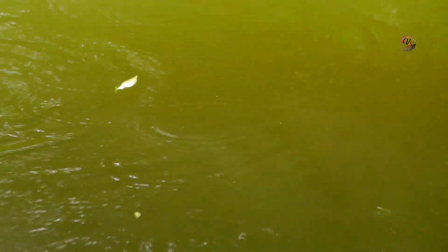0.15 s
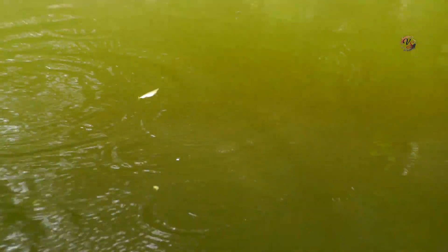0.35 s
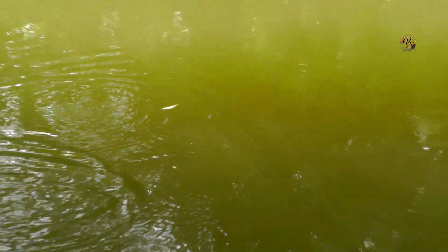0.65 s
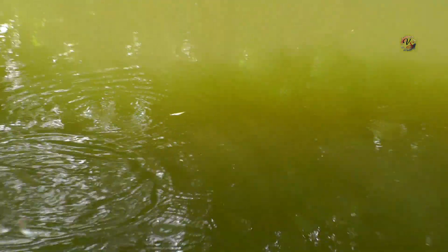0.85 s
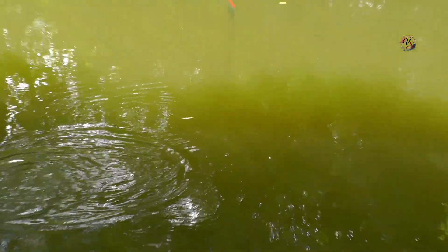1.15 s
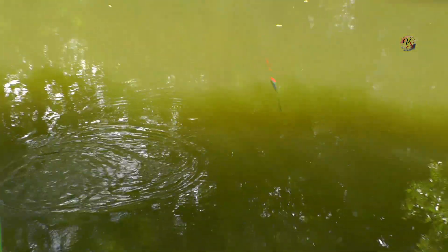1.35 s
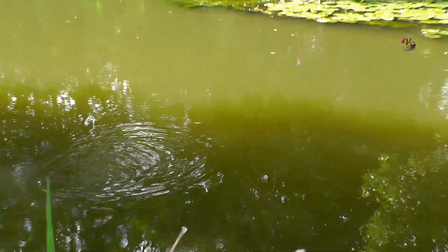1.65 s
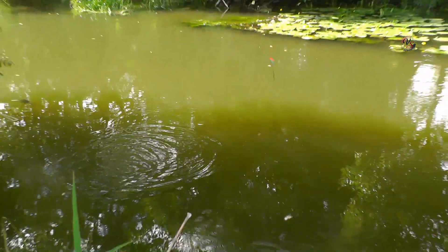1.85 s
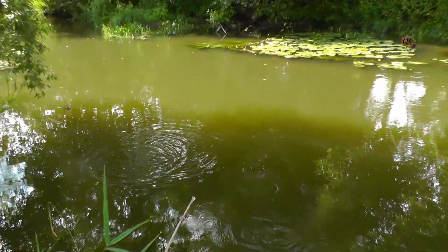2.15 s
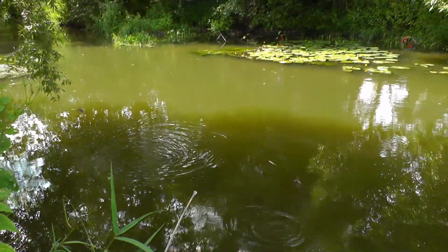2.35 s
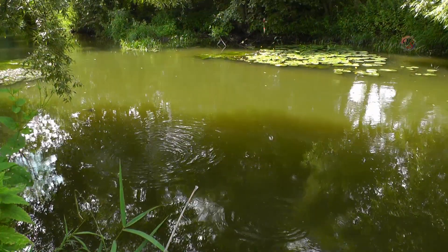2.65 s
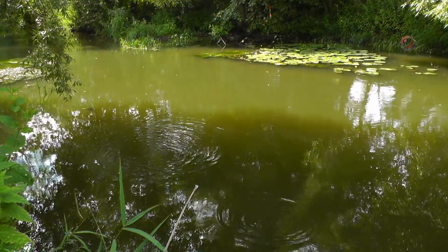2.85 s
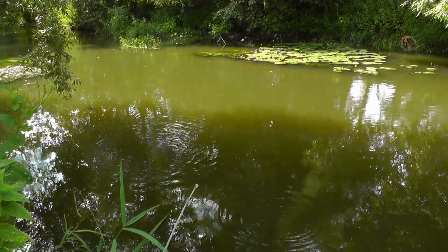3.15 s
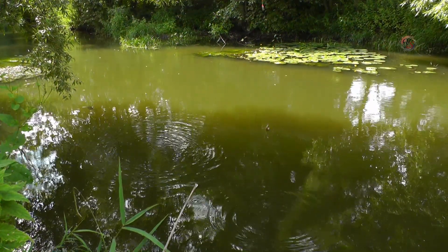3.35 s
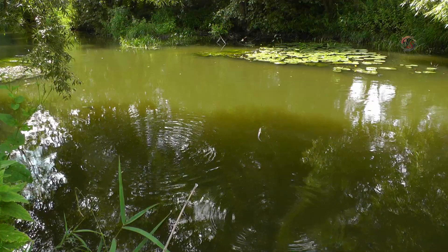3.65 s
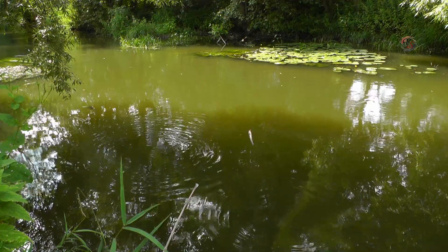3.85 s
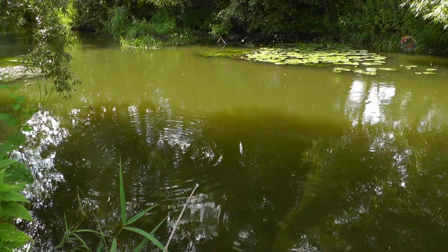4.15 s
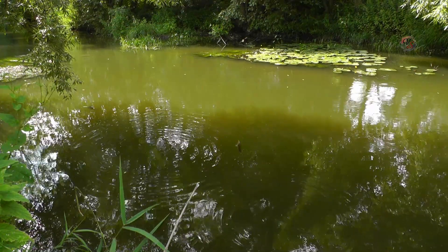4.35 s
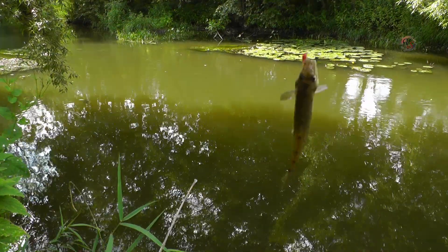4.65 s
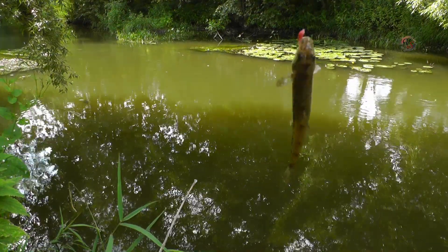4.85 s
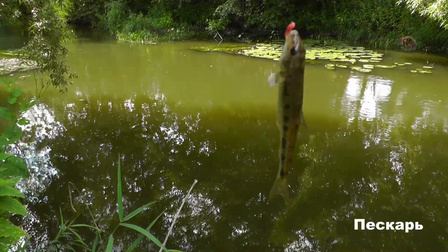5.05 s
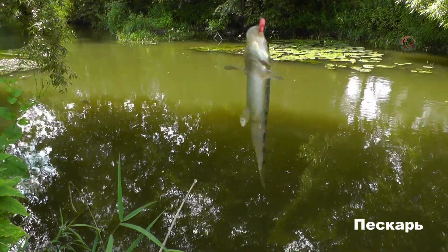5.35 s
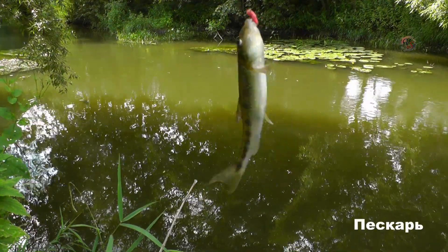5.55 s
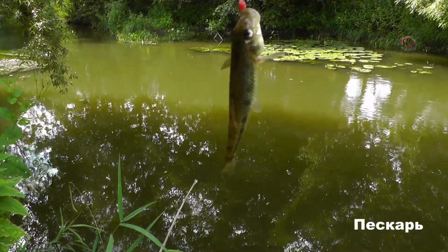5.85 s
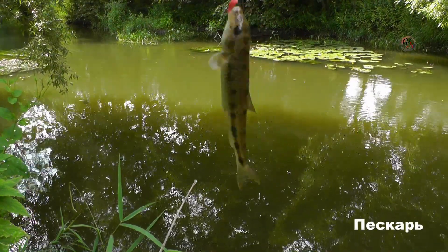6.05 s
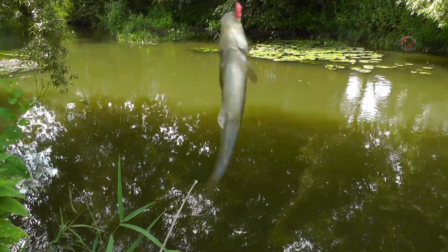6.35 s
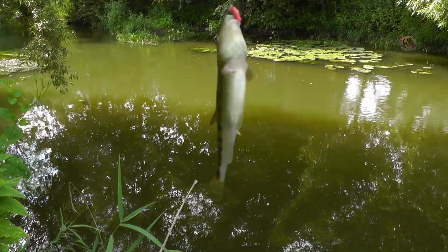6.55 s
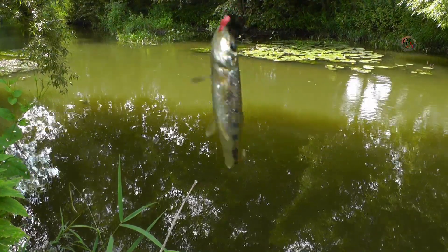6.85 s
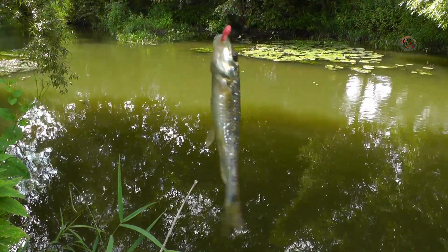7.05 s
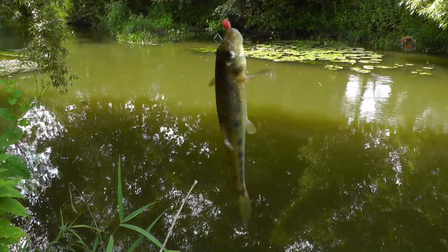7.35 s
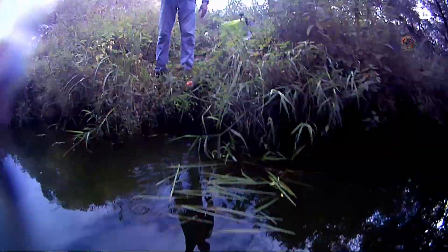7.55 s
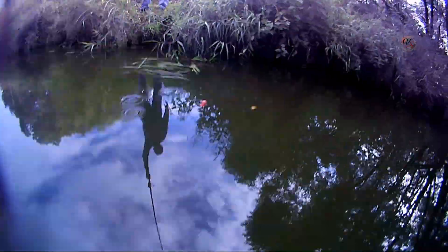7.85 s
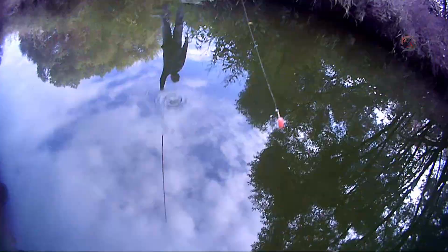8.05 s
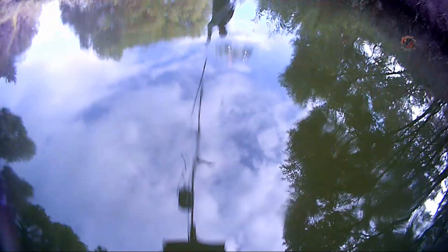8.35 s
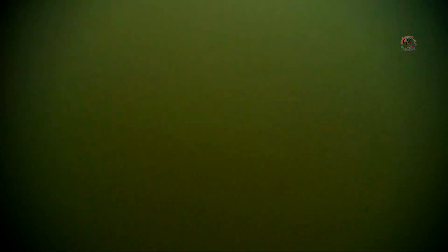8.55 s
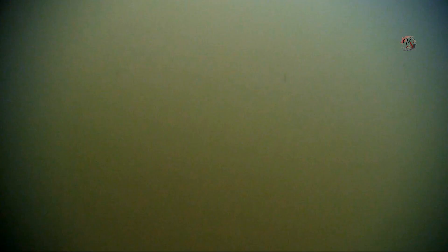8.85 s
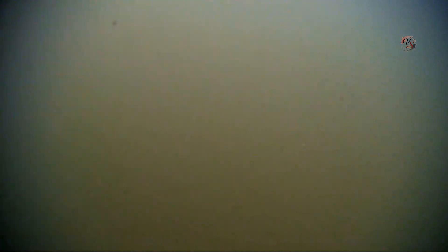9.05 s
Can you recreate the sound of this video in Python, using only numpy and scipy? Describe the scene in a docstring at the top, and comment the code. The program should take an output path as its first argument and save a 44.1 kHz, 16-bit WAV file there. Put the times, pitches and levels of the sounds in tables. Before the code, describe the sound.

Small birds buzz and whistle over low wind rumble and light water drips, then a sudden cut to near silence and a loud gulping plunge.

```python
"""On the bank of a wooded pond, two microphones hear small birds buzz and whistle, and an insect shrill briefly
near 11 kHz, as warbling tones with scatter. Wind rumble, roar and hiss are shaped noise, with puffs on the
right port; drips are ringing bubbles and spray. The hiss steps up at 4.556 s. At 7.63 s a hard switch leads to
a second, mono camera with a faint stuttering whine (harmonic sines). It is swung out and plunges in: noise-
burst splashes, knocks that ring the housing, and an overloading gulp of large and small bubbles."""
import sys
import numpy as np
from scipy import signal
from scipy.fft import rfft, irfft
from scipy.io import wavfile
from scipy.ndimage import uniform_filter1d

SR = 44100
rng = np.random.default_rng(int(sys.argv[2]) if len(sys.argv) > 2 else 0)


def inscribe(sig):
    """Save sig as 16-bit PCM at rate SR to the path in sys.argv[1].

    A 1-D sig is mono; a 2-D sig holds one channel per row.
    Samples are clipped to [-1, 1] before scaling.
    """
    pcm = np.round(np.clip(np.atleast_2d(sig).T, -1, 1) * 32767)
    wavfile.write(sys.argv[1], SR, pcm.astype(np.int16))


N = 405279
T = np.arange(N) / SR
SWAP_S, SUNK_S = 7.63, 8.632  # the second camera takes over; it goes under


def amp(db):
    """Decibels to amplitude."""
    return 10 ** (np.asarray(db) / 20)


def evened(x):
    """Scale to an RMS of one."""
    return x / np.sqrt(np.mean(x ** 2) + 1e-20)


def read(points, hz):
    """Read a curve along log frequency."""
    point_hz, value = np.transpose(points)
    return np.interp(np.log(hz + 1), np.log(point_hz + 1), value)


def curve(rows, column=1):
    """Draw one table column as straight lines over time."""
    return np.interp(T, *np.transpose(rows)[[0, column]])


def add(mix, start_s, sound):
    """Lay a sound into the mix, cutting it off at the end."""
    part = mix[..., round(start_s * SR):][..., :sound.shape[-1]]
    part += sound[..., :part.shape[-1]]


def smooth(length, size):
    """Slow chance: noise averaged twice over size samples."""
    once = uniform_filter1d(rng.standard_normal(length), size)
    return evened(uniform_filter1d(once, size))


def noise(spectrum, patchy_db, same=((1, 1), (2, 1)), start=0, stop=N):
    """Random short-time spectra with drifting patches, on two microphones, between two samples."""
    frames, hz = (stop - start) // 256 + 5, np.fft.rfftfreq(1024, 1 / SR)
    a, b, c, d, patches = rng.standard_normal((frames, 513, 5), dtype=np.float32).T
    patches = uniform_filter1d(patches, size=8, axis=0)
    patches = evened(uniform_filter1d(patches, size=8, axis=1))
    likeness = np.clip(read(same, hz), -1, 1)[:, None]
    left = a + 1j * b
    right = likeness * left + np.sqrt(1 - likeness ** 2) * (c + 1j * d)
    spectra = np.array([left, right]) * amp(read(spectrum, hz)[:, None] + patchy_db * patches)
    out = evened(signal.istft(spectra, nperseg=1024, noverlap=768)[1][:, :stop - start])
    return np.pad(out, ((0, 0), (start, N - stop)))


def band(x, hz, width_hz):
    """One resonance."""
    return signal.lfilter(*signal.iirpeak(hz, hz / width_hz, SR), x)


def chirp(length_s, level_db, first_hz, last_hz, warble_hz, pan_db):
    """A thin whistle drifts and warbles fast and unevenly, in short pulses, swinging widest at full effort."""
    u = np.linspace(0, 1, round(length_s * SR))
    effort = np.sin(np.pi * u ** 0.76)
    warble = 0.897 * smooth(len(u), size=60) + 0.4362 * smooth(len(u), size=500)
    swing_hz = warble_hz * (0.613 + 0.4673 * effort) * warble
    hz = first_hz + (last_hz - first_hz) * u + swing_hz
    pulses = amp(2.51 * smooth(len(u), size=90) + 1.56 * smooth(len(u), size=250))
    tone = evened(np.sin(2 * np.pi * np.cumsum(hz) / SR) * pulses)
    return tone * effort ** 0.76 * amp(level_db + pan_db * np.array([[.5], [-.5]]))


def scattered(calls):
    """Leaves and banks scatter each call in sparse echoes, differently for the two microphones."""
    t = np.arange(6000) / SR
    sign = rng.choice([-1., 1.], (2, 6000))
    sparse = rng.random((2, 6000)) < .05
    decay = amp(-60 * t / 0.053) + amp(-2.5 - 60 * t / 0.48)  # a short and a long decay
    echoes = sign * sparse * decay
    echoes /= np.linalg.norm(echoes, axis=1, keepdims=True)
    return amp(-3.0) * calls + amp(1.5) * signal.oaconvolve(calls, echoes, axes=1)[:, :N]


# Buzzy two-voiced calls of one kind of bird, levels before scatter and pan:
# start_s, length_s, level_db, low_voice_hz, high_voice_hz
BUZZ_CALLS = [(.001, 0.084, -51.5, 6360, 7350), (0.249, .12, -48, 6250, 7610),
              (0.405, .15, -51.5, 6800, 7625), (0.799, 0.1356, -49, 6560, 7720),
              (1.158, .12, -58, 6550, 7700), (1.403, 0.16, -53.5, 6096, 7460),
              (1.6, .11, -54.5, 6266, 7200), (1.895, .145, -50.5, 6300, 7450),
              (2.188, 0.13, -52, 6650, 7700), (2.29, 0.111, -56, 6300, 7150),
              (2.372, 0.085, -52, 6380, 7400), (2.68, 0.116, -53, 6990, 8130),
              (3.189, 0.142, -54.5, 6380, 7265), (3.782, 0.103, -58, 6120, 6690),
              (4.102, 0.14, -52, 7120, 8480), (4.262, .12, -52, 6920, 8200), (4.43, .065, -58, 6100, 6930),
              (4.549, 0.062, -47.5, 6670, 7600), (4.609, .2, -51.5, 6404, 7204),
              (4.803, 0.148, -46, 6400, 7465), (5.045, 0.129, -43.5, 6650, 7800),
              (5.242, .11, -45, 6626, 7900), (5.491, 0.1406, -43, 7186, 8223),
              (5.99, 0.192, -55.5, 6447, 6900), (6.15, 0.15, -45.5, 6970, 8150),
              (6.596, 0.137, -49, 6560, 7900), (6.901, .11, -58.5, 6780, 7600),
              (7.07, 0.14, -54, 6300, 6820), (7.167, 0.1287, -46, 6850, 8160),
              (7.568, 0.067, -55.5, 6160, 6960)]
# Thin whistles, with an insect's brief high calls near 11 kHz among them, levels likewise: start_s, length_s,
# level_db, first_pitch_hz, last_pitch_hz
WHISTLE_CALLS = [(0.04, .075, -53.5, 5534, 5500), (0.447, 0.083, -47, 5760, 6380),
                 (1.064, 0.091, -58.5, 10900, 10760), (1.073, 0.154, -47.5, 11250, 11290),
                 (1.17, 0.107, -52, 5450, 5530), (1.555, 0.0835, -51, 6230, 6220),
                 (1.798, 0.0218, -49, 5950, 4350), (1.816, 0.051, -46, 5247, 5545),
                 (1.81, 0.0378, -46, 6345, 6746), (2.009, 0.115, -47.5, 5400, 5750),
                 (2.291, 0.13, -52.5, 6215, 6080), (2.626, 0.095, -53, 5580, 5493),
                 (2.638, 0.079, -54, 6300, 6594), (2.795, 0.0306, -52, 6474, 3933),
                 (2.814, 0.02, -53.5, 3787, 6370), (2.826, 0.074, -44.5, 6420, 6500),
                 (2.827, 0.1, -49.5, 7000, 6930), (4.988, 0.0726, -47.5, 6740, 5400),
                 (5.215, 0.0122, -44.5, 8200, 7220), (5.399, .043, -53.5, 5850, 5710)]
BUZZ_RISE = 0.0099  # each voice climbs from this share below its pitch to as much above
# warble scale, widened further by effort; the buzz figure is for a call at MEAN_CALL_DB
BUZZ_WARBLE_HZ, WHISTLE_WARBLE_HZ, MEAN_CALL_DB = 383, 130.8, -48
WARBLE_PER_DB = 0.5  # louder buzzes warble wider (dB per dB)
BUZZ_PAN_DB, WHISTLE_PAN_DB = -.4, .5  # left over right


def birds():
    """Each buzz is two warbling voices at once, each whistle one; the wood scatters them all."""
    calls = np.zeros((2, N))
    for start_s, length_s, level_db, *voices in BUZZ_CALLS:
        warble_hz = BUZZ_WARBLE_HZ * amp(WARBLE_PER_DB * (level_db - MEAN_CALL_DB))
        for voice_hz in voices:
            first_hz, last_hz = voice_hz * (1 - BUZZ_RISE), voice_hz * (1 + BUZZ_RISE)
            add(calls, start_s, chirp(length_s, level_db, first_hz, last_hz, warble_hz, BUZZ_PAN_DB))
    for start_s, *shape in WHISTLE_CALLS:
        add(calls, start_s, chirp(*shape, WHISTLE_WARBLE_HZ, WHISTLE_PAN_DB))
    return scattered(calls)


def fizz(t):
    """Fifty tiny bubbles start within 90 ms and ring at 900 to 8100 Hz, few of them loud."""
    when, pitch, size = rng.random((50, 3, 1)).transpose(1, 0, 2)
    age = np.maximum(t - when * .09, 0)
    hz = 900 * 9. ** pitch
    level_db = 14.0 * size ** 2 - 60 * age * hz / 18.0  # 60 dB down after 18 cycles
    return (amp(level_db) * np.sin(2 * np.pi * hz * age)).sum(axis=0)


# Water slapping, level before the swell: start_s, level_db, t60_s
WATER_SLAPS = [(.035, -40.5, 0.21), (.14, -39.5, 0.23), (.16, -44, .096), (.219, -34.5, 0.074),
               (1.415, -32, 0.099), (1.44, -37.5, 0.099), (1.457, -31, 0.051), (1.542, -39.5, 0.185),
               (1.566, -33, 0.13), (1.605, -42, 0.23), (7.66, -66, .4), (7.705, -62.5, 0.21),
               (7.801, -63.5, 0.185), (7.875, -53, 0.0506), (7.983, -44, 0.0277), (7.994, -57.5, .25),
               (8.012, -53, 0.125), (8.036, -52, 0.085), (8.456, -62, .06), (8.489, -63, .086),
               (8.599, -34, 0.11), (8.606, -21, 0.08), (8.611, -8, 0.0296), (8.618, -18, 0.0557),
               (8.635, -28, 0.041), (8.649, -31.5, 0.092), (8.662, -33.5, .092), (8.678, -33, 0.066),
               (8.685, -27, .045), (8.697, -15, 0.039), (8.701, -10.5, 0.0247), (8.711, -9.5, .05),
               (8.723, -11.5, 0.0818), (8.745, -33, 0.08), (8.775, -38.5, .06), (8.807, -48.5, .098),
               (8.842, -54.5, 0.096), (8.885, -63, 0.171), (8.965, -66.5, .25)]
# Spray colour, before tilt: frequency_hz, relative_db
SPRAY_SPECTRUM = [(59, -33), (100, 15), (434, 3), (1190, -2.5), (2520, -6.5), (4000, -12), (6220, -19),
                  (10700, -28.5), (13800, -40.5), (15000, -76)]
# By place: heard from the bank; at the second camera in the air; under water
# Swell time of a slap: [rise_s]
SLAP_SWELL_S = (0.007, 0.0024, 0.0018)
# Treble tilt: [tilt_db per octave]
SLAP_TREBLE_DB = (8.5, 3.5, 0.24)
# Spray over fizz: [level_db]
SPRAY_OVER_FIZZ_DB = (4.5, 2.5, -1)


def splash():
    """Each slap is a burst of spray noise and a swarm of tiny bubbles, swelling fast and dying away."""
    mix, t, hz = np.zeros(N), np.arange(8192) / SR, np.fft.rfftfreq(8192, 1 / SR)
    for start_s, level_db, t60_s in WATER_SLAPS:
        place = (start_s > SWAP_S) + (start_s > SUNK_S)
        tilt_db = SLAP_TREBLE_DB[place] * np.log2(hz / 1500 + .05)
        colour = amp(read(SPRAY_SPECTRUM, hz) + tilt_db)
        spray = rng.standard_normal(8192) * amp(2.2 * smooth(8192, size=40))
        swarm = evened(np.pad(fizz(t[:4096]), (0, 4096)))
        both = amp(SPRAY_OVER_FIZZ_DB[place]) * evened(spray) + swarm
        crackle = evened(irfft(rfft(both) * colour))
        swell = 1 - np.exp(-(t / SLAP_SWELL_S[place]) ** 2)
        add(mix, start_s, crackle * amp(level_db - 60 * t / t60_s) * swell)
    return mix


def ring(level_db, pitch_hz, t60_s, slide, rise_s):
    """A pocket of air rings as a dying sine; its pitch slides as it nears the surface."""
    t = np.arange(9000) / SR
    hz = pitch_hz * slide ** np.minimum(t / .039, 2)  # slides for 78 ms, then holds
    phase = 2 * np.pi * np.cumsum(hz) / SR
    return amp(level_db - 60 * t / t60_s) * (1 - np.exp(-t / rise_s)) * -np.sin(phase)


# Small bubbles, level before the swell: start_s, level_db, pitch_hz, t60_s, pitch_factor after 39 ms
SMALL_BUBBLES = [(.042, -38, 1560, .034, 0.98), (.128, -32.5, 1047, 0.052, 1.8),
                 (.171, -37.5, 1943, .026, 1.06), (.22, -29.5, 582, 0.0255, 0.61),
                 (0.223, -32.5, 1196, 0.019, 1.63), (.541, -27, 1345, 0.053, .81),
                 (1.418, -33, 1520, 0.0117, 1.2), (1.424, -32, 2610, .02, 1.3),
                 (1.438, -30, 1850, .019, 1.3), (1.458, -27.5, 2715, .017, 1.24),
                 (1.459, -32, 4600, .02, 1.2), (1.542, -31.5, 766.3, 0.069, 1.82),
                 (1.572, -9, 2043, .0073, 1.1), (1.579, -25.5, 2993, .025, 0.67),
                 (1.582, -28, 886, 0.034, 1.05), (1.609, -33.5, 1051, 0.0225, .84),
                 (1.623, -34, 2570, 0.048, 1.38), (7.876, -47, 2201, .028, 1.14),
                 (7.984, -45.5, 2018, .025, 1.02), (7.998, -45, 2323, .024, 1.04),
                 (8.012, -36, 2284, 0.0146, 1.04), (8.022, -41, 1880, .031, .91),
                 (8.039, -34, 2003, .023, 0.75), (8.041, -39, 1340, 0.053, 0.93),
                 (8.685, -8.5, 1480, 0.026, 0.72), (8.696, 5, 1450, 0.0056, 1.5),
                 (8.698, -3, 2564, 0.0084, 0.98), (8.702, -3, 824, 0.0214, 0.465),
                 (8.716, -4.5, 996.4, 0.028, 1.37), (8.812, -47, 2290, 0.044, 0.96),
                 (8.843, -44, 1567, .042, 1.06), (8.855, -52, 2928, .03, 1.02),
                 (8.887, -53.5, 2230, .035, 1.1), (8.97, -52, 2530, 0.033, .82),
                 (8.993, -53.5, 2205, .048, 1.43), (9.021, -46.5, 2170, 0.046, .85)]
# Big pockets of air round the sinking camera, level likewise:
# start_s, level_db, pitch_hz, t60_s, pitch_factor after 39 ms, rise_s
AIR_GULPS = [(8.7093, -1, 90, .04, 0.98, 0.00142), (8.722, 1.5, 288, 0.0387, 0.946, 0.00042),
             (8.724, 11.5, 455, 0.075, 0.96, 0.0008), (8.725, 3, 601.1, 0.067, 1.12, 0.0026),
             (8.808, -20.5, 597, .115, .97, 0.00082), (8.808, -27, 448.6, .15, 1.09, 0.0044),
             (8.843, -21, 639.4, 0.0394, 1.006, 0.00265), (9.053, 4, 585.7, 0.1, 1.069, 0.01417),
             (9.092, -6.5, 627, 0.0672, 0.943, 0.0079), (9.095, -34.5, 840, .114, 1.025, 0.0047)]
# Overtones of a gulp: multiple of its pitch, relative_db
GULP_OVERTONES = [(2, -46.5), (3, -44)]
RISE_SHARE = 0.049  # rise of a small bubble, as a share of its t60
OVERTONE_RING = 0.71  # overtones die sooner: share of the gulp's t60


def bubbles():
    """Small bubbles are pure; big gulps carry faint overtones."""
    mix = np.zeros(N)
    for start_s, level_db, pitch_hz, t60_s, slide in SMALL_BUBBLES:
        add(mix, start_s, ring(level_db, pitch_hz, t60_s, slide, RISE_SHARE * t60_s))
    for start_s, level_db, pitch_hz, t60_s, *shape in AIR_GULPS:
        add(mix, start_s, ring(level_db, pitch_hz, t60_s, *shape))
        for k, over_db in GULP_OVERTONES:
            add(mix, start_s, ring(level_db + over_db, k * pitch_hz, OVERTONE_RING * t60_s, *shape))
    return mix


# Handling and moving water at the second camera: time_s, thud_level_db, housing_ring_level_db
SLOSH_LEVELS = [(7.64, -44.5, -82), (7.83, -45.5, -83), (7.92, -57.5, -87.5), (7.99, -44.5, -70),
                (8.05, -48, -68), (8.1, -57.5, -81.5), (8.35, -57.5, -96.5), (8.59, -50.5, -81),
                (8.62, -28.5, -61), (8.68, -54, -51), (8.77, -49, -37.5), (8.8, -52, -46), (8.83, -52, -39),
                (8.87, -57.5, -54), (9.04, -47, -55.5), (9.11, -37, -50.5), (9.19, -63.5, -76)]
# Thud colour: frequency_hz, relative_db
THUD_SPECTRUM = [(8.8, -51), (15, -6), (54, 2), (66, -8), (75, -6.5), (295, -25), (458, -30), (500, -17.5),
                 (650, -69.5), (1100, -120)]
# Resonances of the housing: frequency_hz, width_hz of the narrower of two filters, relative_db
HOUSING_MODES = [(448, 27, -1), (603, 51, 4.5)]


def housing():
    """Handling and moving water thud on the case and keep it ringing."""
    shake = rng.standard_normal(N) * amp(2.2 * smooth(N, size=200))
    modes = 0
    for hz, width_hz, level_db in HOUSING_MODES:
        modes = modes + amp(level_db) * band(band(shake, hz, width_hz), hz, 3 * width_hz)
    thud = noise(THUD_SPECTRUM, 2.2, start=round(SWAP_S * SR))[0]
    return amp(curve(SLOSH_LEVELS)) * thud + amp(curve(SLOSH_LEVELS, column=2)) * evened(modes)


# Droplets snapping: start_s, peak_db
DROPLET_TICKS = [(.042, -33), (.119, -26), (.157, -27.5), (0.186, -30.5), (.237, -32), (.311, -34),
                 (.398, -35), (0.443, -27), (1.364, -25.5), (1.458, -30.5), (1.571, -27), (1.646, -39),
                 (3.145, -34)]


def ticks():
    """Each snap is a few milliseconds of noise round 11 kHz."""
    mix, t = np.zeros((2, N)), np.arange(600) / SR
    for start_s, peak_db in DROPLET_TICKS:
        burst = rng.standard_normal((2, 600)) * amp(-60 * t / 0.0173) * np.minimum(t / 0.001, 1)
        snap = band(band(burst, 11000, 8000), 11000, 8000)
        add(mix, start_s, amp(peak_db) * snap / abs(snap).max())
    return mix


# Puffs of air on the right microphone port: middle_s, level_db, length_s
AIR_PUFFS = [(0.957, -35, 0.074), (1.28, -45, 0.061), (1.488, -25.5, 0.083), (1.59, -35, .06),
             (1.676, -38, .04), (1.755, -37.5, 0.07), (1.936, -33, 0.066), (2.012, -36, 0.046),
             (2.085, -31, 0.0464), (2.175, -29, 0.071), (2.3, -35, 0.072), (2.445, -31, 0.0646),
             (2.59, -39, 0.056), (2.772, -43.5, 0.094), (2.904, -45, 0.075), (3.903, -42, 0.05)]
# Puff colour: frequency_hz, relative_db
PUFF_SPECTRUM = [(8.8, -36.5), (15, -20), (70, 7), (112, -0.5), (220, -13), (269, -23), (414, -33.5),
                 (600, -34), (780, -64), (1320, -120)]


def puffs():
    """Lumps of low turbulence strike the right port and hardly reach the left."""
    swell = np.zeros(N)
    for middle_s, level_db, length_s in AIR_PUFFS:
        swell += amp(level_db) * np.exp(-((T - middle_s) / (.5 * length_s)) ** 2)
    return amp([[-18], [0]]) * swell * noise(PUFF_SPECTRUM, 1.2)[0]


# Wind at the bank, before gusting: time_s, buffeting_level_db, rumble_level_db
WIND_LEVELS = [(0, -50, -46), (.55, -43.5, -40.5), (1.05, -50.5, -43.5), (1.2, -50, -38),
               (1.5, -40.5, -42.5), (2.05, -44, -43), (2.55, -40.5, -42), (3.3, -53, -42.5),
               (4.45, -52, -46.5), (4.6, -50.5, -41), (6.15, -50.5, -37.5), (7.4, -62, -36),
               (7.6, -50.5, -33)]
# Farther roar, before gusting: time_s, level_db
ROAR_LEVELS = [(0, -50.5), (2.1, -50), (2.6, -51.5), (3.3, -49.5), (4.45, -52), (4.6, -48.5), (5.7, -47.5),
               (6.15, -43.5), (7.63, -45)]
# Colours of buffeting, rumble and roar: frequency_hz, relative_db
BUFFET_SPECTRUM = [(15, -23.5), (30, -30), (60, -19), (80, 24.5), (110, 1), (200, -27)]
RUMBLE_SPECTRUM = [(50, -44), (85, -2.5), (120, 6.5), (170, -6.5), (240, -11.5), (500, -46.5)]
ROAR_SPECTRUM = [(120, -55), (220, 2), (320, -7.5), (450, -12), (700, -23.5), (1400, -60)]
# Left-right likeness of far sound and hiss: frequency_hz, likeness from -1 to 1
STEREO_LIKENESS = [(25, 0.1856), (60, 1), (130, 0.996), (290, 0.953), (640, 0.787), (1410, 0.213),
                   (3100, -0.15), (6800, -0.021)]


def wind():
    """Gusts buffet each port on its own; the farther rumble and roar swell on both together."""
    gusts = amp(1.56 * np.array([smooth(N, size=3000), smooth(N, size=3000)]))
    buffet = amp(curve(WIND_LEVELS)) * gusts * noise(BUFFET_SPECTRUM, 1.29, [(25, 0.8), (100, 1.0)])
    rumble = amp(curve(WIND_LEVELS, column=2)) * noise(RUMBLE_SPECTRUM, 0.56, STEREO_LIKENESS)
    roar = amp(curve(ROAR_LEVELS)) * noise(ROAR_SPECTRUM, 0.57, STEREO_LIKENESS)
    return buffet + (rumble + roar) * amp(0.74 * smooth(N, size=700))


# Whine of the second camera: multiple of the pitch, level_db
WHINE_HARMONICS = [(1, -69), (2, -71), (3, -76), (5, -89), (6, -82), (7, -90)]
WHINE_HZ, STUTTER_HZ, STUTTER_S = 1434.5, 22.62, 8.128  # pitch, bursts a second, middle of one burst


def whine():
    """The camera's electronics leak a buzz that breaks off briefly in every cycle."""
    on = np.cos(2 * np.pi * STUTTER_HZ * (T - STUTTER_S)) > -.68
    buzz = sum(amp(level_db) * np.sin(2 * np.pi * k * WHINE_HZ * T) for k, level_db in WHINE_HARMONICS)
    return buzz * uniform_filter1d(on * 1., size=130)  # softened edges


# Hiss colour at the bank: frequency_hz, relative_db
HISS_SPECTRUM = [(180, -11), (300, -10), (434, -10), (638, -8.5), (694, -8), (1110, -8), (1930, -13.5),
                 (2280, -15), (2570, -14.5), (15200, -17), (16500, -54)]


def hiss():
    """Steady shaped noise on both microphones; its level steps up once."""
    level_db = -48.5 + 2.9 * (T > 4.556)
    return amp(level_db) * noise(HISS_SPECTRUM, 0.37, STEREO_LIKENESS)


# Noise floor colour of the second camera: frequency_hz, relative_db
FLOOR_SPECTRUM = [(120, -40), (200, -3), (1250, -14), (1450, -11.5), (2380, -14), (2910, -16.5),
                  (3070, -18), (8900, -23.5), (16000, -28.5)]


def floor():
    """Faint steady shaped noise under the second camera's sound."""
    return amp(-70.5) * noise(FLOOR_SPECTRUM, 1.3, start=round(SWAP_S * SR))[0]


def scene():
    """The bank in stereo, then the plunge on the mono camera."""
    water = bubbles() + splash()
    # drips lie to the left: five samples earlier and a little louder there
    nearby = np.array([np.roll(water, -5), water]) * amp([[.6], [-.6]])
    bank = birds() + nearby + ticks() + puffs() + wind() + hiss()
    plunge = water + housing() + whine() + floor()
    return np.where(T < SWAP_S, bank, plunge)


def record(dry):
    """The converter clips just below full scale; then the treble is cut above 15.9 kHz."""
    clipped = np.clip(dry, -.99, .99)
    lowpass = signal.firwin(511, 15900, window=("kaiser", 9), fs=SR)
    return signal.oaconvolve(clipped, lowpass[None], "same")


dry = scene()
out = record(dry)
inscribe(out)
```